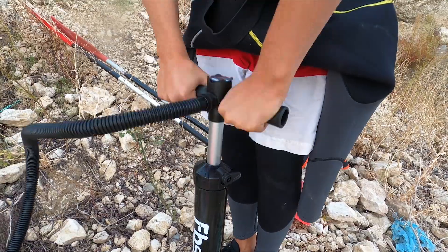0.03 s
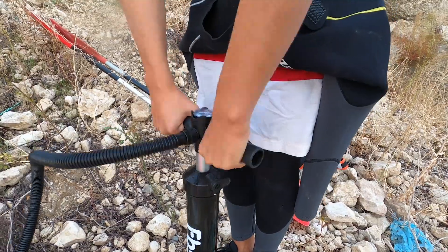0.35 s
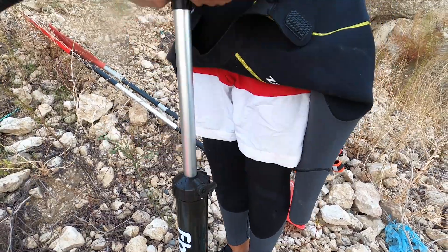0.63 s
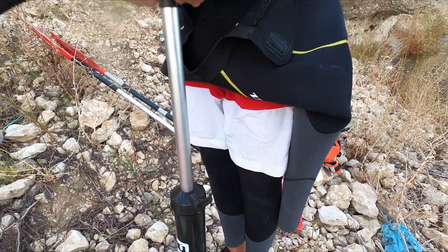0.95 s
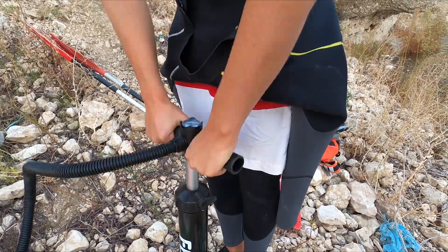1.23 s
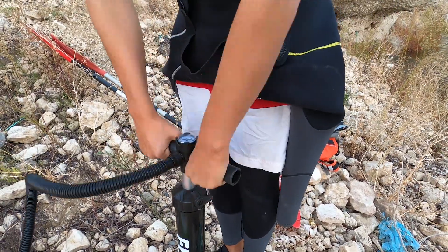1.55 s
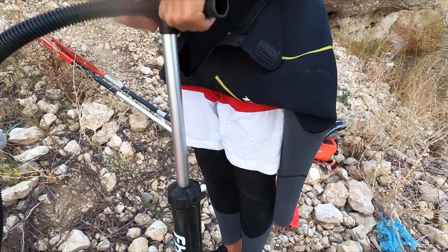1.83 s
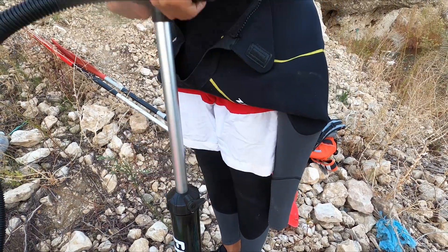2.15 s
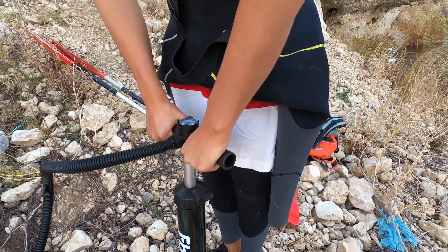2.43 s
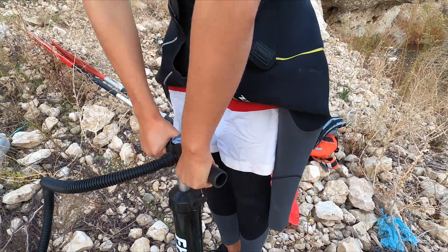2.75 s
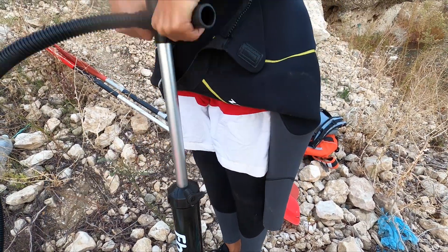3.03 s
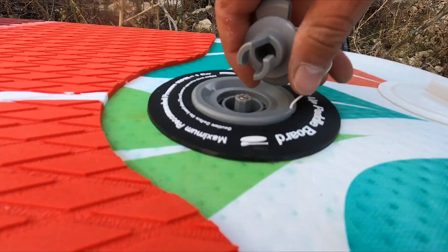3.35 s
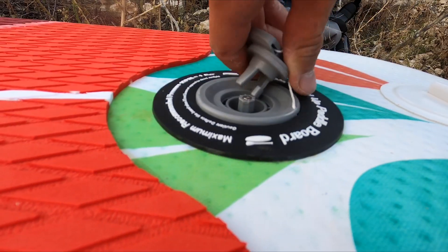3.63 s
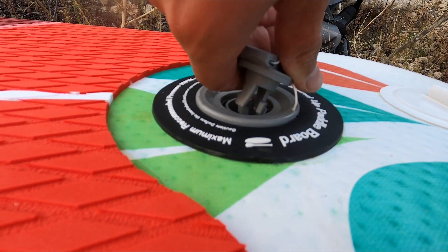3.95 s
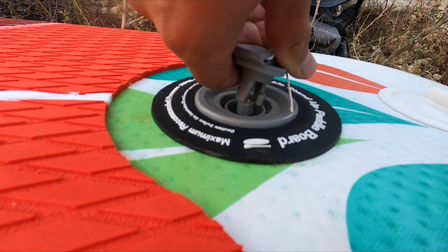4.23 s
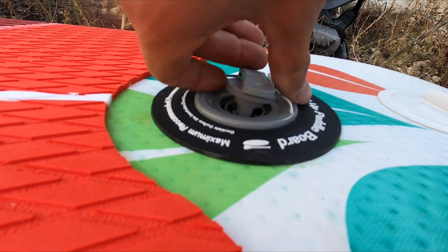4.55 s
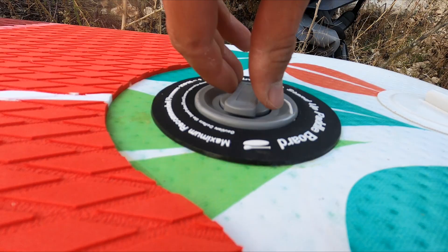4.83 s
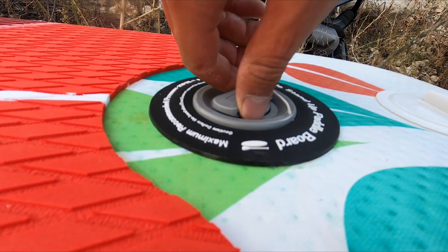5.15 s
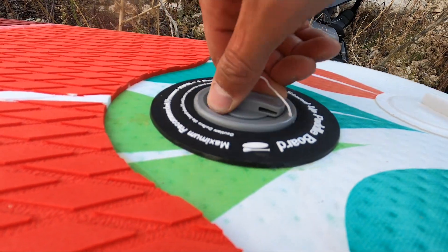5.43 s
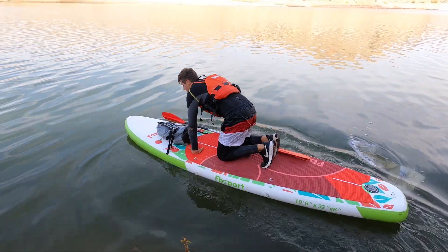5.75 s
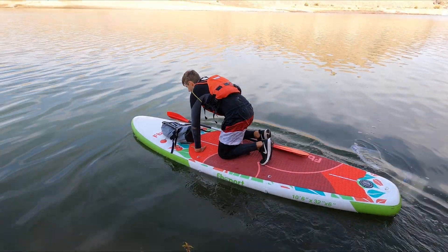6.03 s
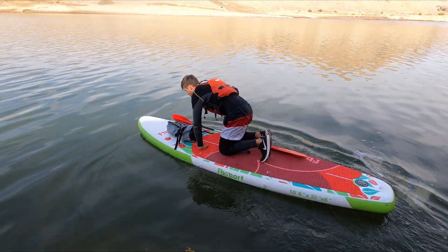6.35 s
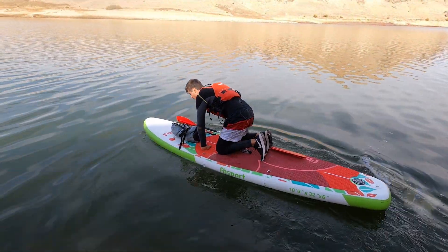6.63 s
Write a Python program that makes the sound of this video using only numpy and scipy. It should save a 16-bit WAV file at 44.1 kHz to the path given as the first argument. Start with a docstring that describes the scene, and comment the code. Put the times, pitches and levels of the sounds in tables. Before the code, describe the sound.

Rhythmic whooshing strokes of a hand pump, then close clicks and hollow knocks of a valve cap being closed, and finally gentle water lapping.

```python
"""First a double-action hand pump fills a paddle board on a stony shore: turbulent air hisses on every
stroke, the piston thuds and the loose handle clacks. Then, close by, fingers rub the board while a
plastic cap is fumbled into the valve; its impacts ring the seat, the spring and the taut board.
The cap is pressed home and twisted shut, rasping by stick-slip friction. Last, the board glides off
over a calm lake, where ringing bubbles trickle and one small wave laps along the hull."""
import sys
import numpy as np
from scipy import signal
from scipy.fft import rfft, irfft, next_fast_len
from scipy.io import wavfile
from scipy.ndimage import uniform_filter1d

SR = 44100
rng = np.random.default_rng(int(sys.argv[2]) if len(sys.argv) > 2 else 0)


def store_pcm(level_fs):
    """Save levels as 16-bit WAV."""
    pcm = np.round(np.clip(level_fs, -1, 1) * 32767).astype(np.int16)
    wavfile.write(sys.argv[1], SR, np.atleast_2d(pcm).T)


N = 303804
TIME = np.arange(N) / SR
BLOW = np.arange(SR // 8) / SR   # time within one short blow
PUMP_END_S, VALVE_END_S, LAKE_START_S = 3.42, 5.745, 5.96
HOSE_EXPONENT = .44   # hose amplitude grows as this power of the flow

# Levels in the tables are relative.
# downstrokes: start/s, end/s, rush level/dB, jet level/dB, lead of the bump at the top/s
PUSH_STROKES = [(-.12, 0.407, -33, -48, .05), (1.119, 1.597, -34.5, -51.5, .059),
                (2.312, 2.794, -34, -55, .041)]
# upstrokes: start/s, end/s, rush level/dB, jet level/dB, top speed t/s, seal thud t/s
PULL_STROKES = [(0.438, 1.008, -28.5, -48.5, .80, 0.56), (1.634, 2.186, -29.5, -50, 2.0, 1.7),
                (2.844, 3.408, -29.5, -49.5, 3.19, 2.959)]
# turbulence spectra of downstroke, upstroke, thin jet and hose: f/Hz, level/dB
PUSH_SPECTRUM = [(500, -29), (850, -31), (1050, -8), (1900, -6.5), (2450, -0.5), (2900, -4), (3500, -6),
                 (4400, -16.5), (6000, -42), (9000, -30)]
PULL_SPECTRUM = [(500, -29), (850, -26), (1050, -9.5), (1900, -9.5), (2400, -3), (2800, -4.5), (3500, -7.5),
                 (4400, -16), (6000, -31), (9000, -35.5)]
JET_SPECTRUM = [(2800, -13), (4000, 18), (5500, 11.5), (7000, 7), (8600, 4.5), (10000, -2.5), (11200, -5.5),
                (12400, 4.5), (13500, -3), (15700, -23.5)]
HOSE_SPECTRUM = [(25, 2), (70, -2), (150, -5), (280, -1), (450, -7.5), (700, -6), (1100, -6), (2000, -19)]
# impacts of the loose handle: t/s, clack level/dB, thud level/dB, thud f/Hz
HANDLE_CLACKS = [(.023, -42.5, -35.5, 205), (.105, -27, -38.5, 233), (0.485, -43.5, -36, 111),
                 (1.681, -39, -44.5, 200), (2.216, -49, -52, 290), (2.41, -33.5, -38, 240)]
# harder tugs on the handle: t/s, width/s, level/dB, f/Hz
HANDLE_TUGS = [(0.575, 0.036, -32.5, 2820), (.72, .04, -34, 2500), (0.875, 0.022, -34, 2680),
               (0.949, 0.028, -37, 3720), (1.865, 0.042, -27, 2680), (2.015, 0.038, -25, 2590),
               (2.106, 0.037, -34, 3640), (2.923, 0.032, -41.5, 2900), (3.076, 0.062, -28.5, 2730),
               (3.3, 0.061, -39, 1360)]
# fingers bearing on the board: start/s, end/s, level/dB
FINGER_GRIPS = [(3.38, 3.455, -35.5), (3.72, 4.06, -38.5), (4.37, 5.133, -38.5), (5.387, 5.451, -25),
                (5.577, 5.648, -36.5)]
# friction spectra of board and skin: f/Hz, level/dB
RUMBLE_SPECTRUM = [(25, -13), (58, -9), (76, 6), (125, -6), (175, -5.5), (270, -11.5), (400, -21.5),
                   (600, -29.5), (1200, -54)]
SKIN_SPECTRUM = [(400, 1), (1000, 5.5), (2000, 1), (3500, -3), (4600, -12.5), (6500, -13), (8300, -13),
                 (10000, -22.5), (15000, -34.5)]
# cap against valve: t/s, weight on the board/dB, click level/dB, click f/Hz, tick level/dB
CAP_TAPS = [(3.694, -28, -42, 880, -49), (3.731, -25, -39, 1430, -57), (3.768, -33.5, -28.5, 1800, -54),
            (3.848, -37.5, -46.5, 2150, -77), (3.897, -33.5, -37, 1890, -60.5),
            (3.982, -31, -30.5, 3250, -59.5), (4.015, -26.5, -34.5, 3300, -55.5),
            (4.132, -42, -58.5, 2310, -75), (4.365, -31, -40.5, 1976, -61.5),
            (4.401, -20.5, -25, 1645, -58), (4.453, -19.5, -23, 1630, -46), (4.502, -28.5, -34, 1730, -58),
            (4.655, -26, -34, 1745, -72), (4.675, -21, -25.5, 1653, -61.5),
            (4.749, -22.5, -32, 1000, -63.5), (4.774, -21, -27.5, 1680, -56),
            (4.823, -36, -27, 1590, -49.5), (4.835, -18, -29.5, 2180, -65.5),
            (4.973, -36.5, -45, 1240, -62.5), (5.019, -22, -58.5, 2100, -67.5),
            (5.083, -16.5, -31, 990, -52), (5.224, -32, -72, 1240, -78), (5.427, -22.5, -43, 1050, -56),
            (5.433, -22, -35, 2600, -56)]
# resonances of the cap: f/Hz, bandwidth/Hz, level/dB
CAP_MODES = [(467, 90, 16.5), (889, 510, 16), (1350, 250, -12.5), (1700, 1200, -15), (2496, 600, -1.5),
             (3680, 210, 6)]
# modes of the inflated board and the valve seat: f/Hz, level/dB, T60/s
BOARD_MODES = [(77.1, 0.5, 0.42), (91.7, -0.5, 0.38), (108, -2, 0.2), (148.6, -5, 0.27), (174.5, 2.5, 0.18),
               (198.1, -0.5, 0.21), (231.5, -4, 0.35), (264, -10, 0.56), (316, -33, 0.59),
               (346.6, -12, 0.16)]
SEAT_MODES = [(240, -8, 0.053), (362, -22.5, 0.019), (420, -0.5, 0.073), (463, -6.5, 0.088),
              (594, -11, 0.03), (696, -13.5, 0.062)]
# modes rung by twangs of the valve spring: t/s, f/Hz, level/dB, T60/s
SPRING_TWANGS = [(3.77, 1460, -58, 0.45), (4.016, 3175, -52, 0.28), (4.454, 1970, -37.5, 0.74),
                 (4.455, 2300, -45, 0.44), (4.677, 2290, -50, 0.61), (4.83, 1986, -38.5, 0.31)]
# cap rubbing in its seat: t/s, length/s, level/dB, slip rate/Hz, f/Hz, bandwidth/Hz, seat level/dB
CAP_RUBS = [(4.372, 0.029, -39, 320, 1960, 620, -40), (4.448, 0.019, -32.5, 350, 1870, 530, -37.5),
            (4.801, 0.037, -29, 320, 1640, 307, -28), (4.995, 0.012, -43, 230, 3030, 900, -44),
            (5.066, 0.0081, -43.5, 300, 3020, 890, -39), (5.382, 0.071, -29.5, 240, 936, 280, -27.5)]
# spectra of water, spray and breeze: f/Hz, level/dB
WATER_SPECTRUM = [(300, 8), (600, 1), (1400, 3), (2200, 0), (3500, -7.5), (5000, -11.5), (8000, -37),
                  (12000, -37)]
SPRAY_SPECTRUM = [(3000, 4), (5500, -4), (8000, -4.5), (11000, -13), (15000, -29)]
BREEZE_SPECTRUM = [(25, -7), (45, 0), (80, -1.5), (140, 0), (200, -9), (400, -23), (900, -47)]
# bubbles from drips and from plops under the hull: t/s, level/dB, f/Hz
NEAR_DRIPS = [(6.077, -36, 2160), (6.11, -38.5, 1100), (6.26, -41.5, 3200), (6.338, -43, 1080),
              (6.673, -34, 2070), (6.825, -34, 1420)]
HULL_PLOPS = [(6.228, -36, 306), (6.531, -27.5, 258), (6.55, -29.5, 246), (6.765, -28, 290)]
# left-right coherence of the noises: f/Hz, coherence (0-1)
COHERENCE = [(60, 1), (200, 1), (1400, 1), (3100, 1), (4500, 1), (7000, 1), (13000, 0.3)]
# left channel over right: f/Hz, level/dB
PUMP_BALANCE = [(100, -1.5), (5000, 0.4), (8500, 0), (12500, -11.5), (15000, -16)]
VALVE_BALANCE = [(60, -2), (200, -3), (1200, -3), (2400, 1.5), (4400, 1), (8000, -8), (15000, -1)]
# scattering by nearby surfaces against the direct sound: f/Hz, level/dB
PUMP_ECHOES = [(100, -41), (1300, -41), (3000, -20), (6000, -16.5)]
VALVE_ECHOES = [(80, -31), (200, -15.5), (450, -5), (1000, -10.5), (2500, -25), (5000, -17)]


def from_db(db):
    """Amplitude ratio of a level."""
    return 10 ** (np.asarray(db) / 20)


def unit_rms(x):
    """Normalisation to unit power."""
    return x / np.sqrt(np.mean(x ** 2) + 1e-20)


def unit_blow(x):
    """Normalisation to the energy of 20 ms at unit power."""
    return x / np.sqrt(np.sum(x ** 2) / (SR / 50) + 1e-20)


def between(start, end):
    """Gate with 4 ms ramps."""
    return uniform_filter1d(1. * ((TIME >= start) & (TIME < end)), size=176)


def onset(start, attack_s):
    """Exponential approach from 0 to 1."""
    return 1 - np.exp(-np.maximum(TIME - start, 0) / attack_s)


def held(start, end, attack_s, release_db_per_s):
    """Attack, hold and exponential decay."""
    fall_db = np.minimum(release_db_per_s * np.maximum(TIME - end, 0), 200)
    return onset(start, attack_s) * from_db(-fall_db)


def hump(s, width_s):
    """Bell-shaped envelope of height 1."""
    return 1 / (1 + ((TIME - s) / width_s) ** 2 / 2) ** 2


def crest(s, rise_s, fall_s):
    """Exponential growth to 1 at time s, then decay."""
    return np.exp(-np.maximum((s - TIME) / rise_s, (TIME - s) / fall_s))


def drift(per_s):
    """Slow random modulation of unit variance."""
    knots = rng.standard_normal(N // 20)
    return np.interp(TIME * per_s, np.arange(len(knots)), knots) * np.sqrt(3 / 2)


def at_hz(points, hz):
    """Interpolation on a log-frequency axis."""
    f, value = np.transpose(points)
    return np.interp(np.log(hz + 1e-3), np.log(f), value)


def cut(x, hz, kind, order=2):
    """Butterworth filter."""
    sections = signal.butter(order, np.clip(hz, 10, .45 * SR), kind, fs=SR, output="sos")
    return signal.sosfilt(sections, x + 1e-18)


def ring(impulses, hz, t60):
    """Damped oscillator: each impulse starts a decaying sine."""
    r, w = from_db(-60 / (t60 * SR)), 2 * np.pi * hz / SR
    return signal.lfilter([0, np.sin(w)], [1, -2 * r * np.cos(w), r * r], impulses + 1e-18)


def resonate(x, hz, width_hz):
    """Driven resonator with unit peak gain."""
    r = np.exp(-np.pi * width_hz / SR)
    feedback = [1, -2 * r * np.cos(2 * np.pi * hz / SR), r * r]
    return signal.lfilter(np.array([1, 0, -1]) * (1 - r * r) / 2, feedback, x + 1e-18)


def add(track, s, sound):
    """Superposition of a sound at time s."""
    i = max(round(s * SR), 0)
    track[i:i + len(sound)] += sound[:N - i]


def burst(decay_s, tail_db=-28, tail_s=.045):
    """Broadband excitation by a brief contact, with a faint tail."""
    envelope = np.exp(-BLOW / decay_s) + from_db(tail_db) * np.exp(-BLOW / tail_s)
    return rng.standard_normal(len(BLOW)) * envelope * (1 - BLOW / BLOW[-1])


def noise(spectrum):
    """Partly coherent stereo noise of a given spectrum, at unit power."""
    size = next_fast_len(N)
    hz = np.fft.rfftfreq(size, 1 / SR)
    mid, side = rfft(rng.standard_normal((2, size)))
    alike = np.clip(at_hz(COHERENCE, hz), 0, 1)
    stereo = np.sqrt(1 + alike) * mid + np.sqrt(1 - alike) * side * [[1], [-1]]
    gain = from_db(at_hz(spectrum, hz)) / (1 + (hz / spectrum[-1][0] / 2) ** 4)
    return unit_rms(irfft(gain * stereo, size)[:, :N])


def flow(start, end, attack_s, fade_db, power):
    """Piston-driven flow builds up, then fades toward the end of travel."""
    travel = np.clip((TIME - start) / (end - start), 0, 1.5)
    return onset(start, attack_s) * from_db(np.maximum(fade_db * travel ** power, -120))


def barrel(air, start, end, speed, pitch, first_trip_s, last_trip_s, echo):
    """Comb filtering: inlet noise interferes with an echo whose delay follows the piston."""
    on, out = speed > .001, np.zeros((2, N))
    travel = (TIME[on] - start) / (end - start) + .098 * drift(13)[on]   # the arms push unevenly
    trip_s = first_trip_s + (last_trip_s - first_trip_s) * travel
    warped_time = TIME[on][0] + np.cumsum(pitch[on]) / SR
    rush = np.array([np.interp(warped_time, TIME, side) for side in air])
    reflected = np.array([np.interp(TIME[on] - trip_s, TIME[on], side) for side in rush])
    out[:, on] = unit_rms(rush + echo * reflected)
    return out * speed


def pushes(jet, hose):
    """Downstroke turbulence starts abruptly and dies under back pressure; the outlet half whistles."""
    air, out = noise(PUSH_SPECTRUM), 0
    outlet = unit_rms(resonate(air, hz=2870, width_hz=420))
    for start, end, air_db, jet_db, _ in PUSH_STROKES:
        speed = flow(start, end, attack_s=.0074, fade_db=-30, power=2.7)
        whistle = from_db(-2) * onset(start, attack_s=.083) ** 2 * outlet
        rush = barrel(air + whistle, start, end, speed, pitch=np.full(N, 1.01),
                      first_trip_s=.0017, last_trip_s=.00207, echo=.17)
        out += from_db(air_db) * rush + from_db(jet_db + 5) * speed ** .98 * jet
        out += speed ** HOSE_EXPONENT * hose
    return out


def thud(db, hz, cycles=.66):
    """Heavily damped vibration of the struck barrel, with a short rumble."""
    blow = np.sin(2 * np.pi * hz * BLOW) * BLOW * np.exp(-2 * BLOW * hz / cycles)
    rumble = cut(burst(.038), 294, "low")
    return from_db(db) * (unit_blow(blow) + from_db(-9) * unit_blow(rumble))


def snap(db):
    """A short impact excites a broad, bright resonance of plastic."""
    contact = (1 - np.exp(-BLOW / .002)) * burst(.003, tail_db=-30, tail_s=.012)
    return from_db(db) * unit_blow(cut(resonate(contact, hz=2400, width_hz=2200), 4500, "low"))


def pump_knocks():
    """Impact sound of the piston, seal, flap valve and loose handle."""
    out = np.zeros(N)
    for start, *_, seal_s in PULL_STROKES:
        add(out, start + .014, thud(db=-41.5, hz=220))   # slack is taken up
        add(out, seal_s, thud(db=-30, hz=153))   # the seal seats
        add(out, seal_s + .019, thud(db=-39.5, hz=153))   # and rebounds
    for start, *_, lead_s in PUSH_STROKES:
        if start > 0:
            add(out, start - lead_s, thud(db=-38, hz=248))   # bump at the top
            add(out, start, snap(db=-36.5))   # the flap snaps over
            add(out, start + .026, thud(db=-42, hz=142))   # the piston takes the load
    for s, clack_db, thud_db, thud_hz in HANDLE_CLACKS:
        contact = burst(.0028, tail_db=-52, tail_s=.0085)
        clack = cut(resonate(contact, hz=540, width_hz=400), 2300, "low")
        add(out, s, thud(thud_db, thud_hz) + from_db(clack_db) * unit_blow(clack))
        add(out, s - .0015, snap(clack_db - 7))
    return out


def pulls(jet, hose, thinning=.91, dulling=.29, edge_hz=1520):
    """Upstroke turbulence swells, rises and thins at top speed; a gust then passes jet and hose."""
    air, out = noise(PULL_SPECTRUM), 0
    for start, end, air_db, jet_db, surge_s, _ in PULL_STROKES:
        speed = flow(start, end, attack_s=.11, fade_db=-27, power=12)
        jet_flow = onset(start, .063) * flow(start, end, attack_s=.063, fade_db=-31.5, power=17)
        surge, gust = hump(surge_s, width_s=.075), hump(surge_s + .092, width_s=.1)
        pitch = .97 + .09 * surge + .07 * (1 - speed)
        rush = barrel(air, start, end, speed, pitch, first_trip_s=.002283, last_trip_s=.00117, echo=.41)
        low = cut(rush, edge_hz, "low", order=4)
        low = cut(low[:, ::-1], edge_hz, "low", order=4)[:, ::-1]   # backward pass: zero phase
        out += from_db(air_db) * (rush - thinning * surge * low - dulling * gust * (rush - low))
        out += from_db(jet_db + 3.5 * gust) * jet_flow * jet
        out += from_db(5.5 * gust) * speed ** HOSE_EXPONENT * hose
    return out


def tugs():
    """Narrow-band flow noise swells with each harder tug."""
    air = noise(PULL_SPECTRUM)
    return sum(from_db(db) * hump(s, width_s) * unit_rms(resonate(air, hz, width_hz=430))
               for s, width_s, db, hz in HANDLE_TUGS)


def pump_air(flutter_db=.85):
    """Turbulent noise of all strokes over a faint steady hiss; a thin leak precedes each push."""
    jet = noise(JET_SPECTRUM)
    hose = noise(HOSE_SPECTRUM) * from_db(-50 + 1.9 * drift(24.92))
    hiss = noise(PUSH_SPECTRUM)
    rush = pulls(jet, hose) + tugs() + pushes(jet, hose)
    rush *= from_db(flutter_db * (drift(45) + drift(250)))
    turning = sum(between(start - .07, start) for start, *_ in PUSH_STROKES)
    thin = unit_rms(resonate(noise(JET_SPECTRUM), hz=6500, width_hz=900))
    leak = turning * (from_db(-61) * thin + from_db(-55) * hiss)
    return (rush + leak + from_db(-66) * hiss + from_db(-74) * jet) * between(0, PUMP_END_S)


def fingers(skin_db=-26.5, shore_db=-66):
    """Sliding friction on the taut board: rumble and hiss follow the grip, over the shore's hiss."""
    grip = sum(from_db(db) * held(start, end, attack_s=.0091, release_db_per_s=143)
               for start, end, db in FINGER_GRIPS)
    hiss = np.hypot(grip * from_db(skin_db + 2.6 * drift(89)), from_db(shore_db))
    return grip * noise(RUMBLE_SPECTRUM) + hiss * noise(SKIN_SPECTRUM)


def strike(modes, times, levels_db, spread_db):
    """Modal superposition: every blow excites each mode with a random strength."""
    at, out = (np.asarray(times) * SR).astype(int), np.zeros(N)
    for k, (hz, db, t60) in enumerate(modes):
        impulses = np.zeros(N)
        impulses[at] = from_db(levels_db + db + spread_db * rng.standard_normal(len(at)))
        out += ring(impulses, hz, t60) * (-1) ** (k // 2)
    return out


def cap_body(force):
    """Forced response of the hollow cap."""
    return sum((-1) ** k * from_db(db) * resonate(force, hz, width)
               for k, (hz, width, db) in enumerate(CAP_MODES))


def cap_taps(touches):
    """Impacts click at a pitch set by the point of contact and excite the modes of seat and board."""
    out = np.zeros(N)
    bite = 1 - np.exp(-(BLOW / .00091) ** 2)   # soft plastic takes a moment to bite
    for s, weight_db, click_db, click_hz, tick_db in touches:
        contact = bite * burst(.0016, tail_db=-27, tail_s=.017)
        click = unit_blow(resonate(contact, click_hz, width_hz=360))
        click += from_db(-9) * unit_blow(cap_body(contact))
        click = cut(click, max(3750, 1.29 * click_hz), "low", order=8)
        tick = bite * burst(.0026, tail_db=-24, tail_s=.03)
        tick = cut(cut(tick, 7600, "high", order=4), 6000, "low", order=4)
        add(out, s - .0005, from_db(click_db) * unit_blow(click) + from_db(tick_db) * unit_blow(tick))
        thump = cut(resonate(burst(.014), hz=240, width_hz=110), 450, "low", order=3)   # board's skin
        add(out, s, from_db(weight_db - 2) * unit_blow(thump))
    times, weights_db = np.transpose(touches)[:2]
    boom = strike(BOARD_MODES, times + .002, weights_db - 4.5, spread_db=1.5)
    clunk = strike(SEAT_MODES, times + .001, weights_db - .5, spread_db=2.5)
    return out + cut(boom + clunk, 900, "low", order=3)


def spring():
    """Free vibration of the valve spring, one mode to a row; a twang may ring several."""
    return sum(strike([(hz, db, t60)], [s], 0, spread_db=2) for s, hz, db, t60 in SPRING_TWANGS)


def cap_rubs(jitter=.13, uneven_db=5, grit=.1, rim_hz=3050, rim_width_hz=1300):
    """Stick-slip friction: uneven pulses ring the cap, its rim and the seat, under a dry scratch."""
    out = np.zeros(N)
    for start, length_s, db, slip_hz, hz, width, seat_db in CAP_RUBS:
        pressure = held(start, start + length_s, attack_s=.0035, release_db_per_s=606)
        on = pressure > .01
        cycles = np.cumsum((slip_hz * np.exp(jitter * drift(200)))[on]) / SR
        slips = np.diff(np.floor(cycles), prepend=-1) * from_db(uneven_db * drift(400)[on])
        grains = rng.standard_normal(N)[on] * from_db(.9 * drift(220)[on])
        force = slips + grit * grains
        rasp = unit_rms(resonate(force, hz, width)) + from_db(-7) * unit_rms(cap_body(force))
        rasp = unit_rms(cut(rasp, 3650, "low", order=8))
        scratch = from_db(-29) * unit_rms(cut(grains, [4200, 8000], "band"))
        rim = resonate(resonate(force, rim_hz, rim_width_hz), rim_hz, rim_width_hz)
        cap = rasp + scratch + from_db(-19) * unit_rms(rim)
        seat = unit_rms(sum(ring(slips, f, t60) * from_db(level) for f, level, t60 in SEAT_MODES))
        out[on] += pressure[on] * (from_db(db) * cap + from_db(seat_db) * seat)
    return out


def twist_jerks(start_s=5.324, weight_db=-31.5, click_db=-37, click_hz=967, tick_db=-69):
    """Stick-slip starts the twist: five ever faster jerks, as rows like those of CAP_TAPS."""
    gaps_s = .0195 * .85 ** np.arange(5)
    return [(s, weight_db, click_db, click_hz, tick_db) for s in start_s + np.cumsum(gaps_s) - gaps_s]


def bubble(hz, cycles, rise):
    """Damped pulsation of a bubble, rising in pitch as it nears the surface."""
    age = BLOW * hz / cycles
    phase = 2 * np.pi * hz * BLOW * (1 + rise * np.minimum(age, 1))
    return np.sin(phase) * from_db(-60 * age) * (1 - np.exp(-BLOW * hz * 2))


def trickle(per_s=320):
    """Resonances of many small bubbles, random in time, pitch and strength."""
    out, span_s = np.zeros(N), TIME[-1] - LAKE_START_S
    for when, pitch, rank in rng.random((int(per_s * span_s), 3)):
        hz = 650 * 9 ** pitch
        gain = from_db(at_hz(WATER_SPECTRUM, hz) - 4 * np.log(rank + .033)) * hz   # few are loud
        add(out, LAKE_START_S + when * span_s, gain * bubble(hz, cycles=32, rise=.057))
    return out / np.std(out[TIME > LAKE_START_S])


def drips_and_plops():
    """Bubble resonance nearby: drips ring high with a faint splash, plops under the hull ring low."""
    out = np.zeros(N)
    for s, db, hz in NEAR_DRIPS:
        splash = unit_blow(cut(burst(.0034), [900, 5000], "band"))
        add(out, s, from_db(db) * bubble(hz, cycles=36, rise=.052) + from_db(db - 29) * splash)
    for s, db, hz in HULL_PLOPS:
        add(out, s, from_db(db) * bubble(hz, cycles=14, rise=.13))
    return out


def lake(wave_s=6.73, rise_s=.24):
    """Bubble and flow noise swell as one small wave runs along the hull, over a low breeze."""
    water = from_db(-5.5) * trickle() + from_db(-2.5) * noise(WATER_SPECTRUM)
    water *= from_db(-60 + 16 * crest(wave_s, rise_s, fall_s=.68))
    spray_db = -79 + 28 * crest(wave_s, rise_s, fall_s=.14) + 1.4 * drift(200)
    spray = from_db(spray_db) * noise(SPRAY_SPECTRUM)
    near = drips_and_plops()
    breeze = from_db(-49) * noise(BREEZE_SPECTRUM)
    return (water + spray + near + breeze) * onset(LAKE_START_S, attack_s=.1)


def place(x, balance, scattered, left_lead_s, scatter_s):
    """Localisation by level and time differences, with scattered sound in antiphase between sides."""
    size = next_fast_len(N + len(BLOW))
    hz = np.fft.rfftfreq(size, 1 / SR)
    half = np.array([[.5], [-.5]])
    direct = from_db(half * at_hz(balance, hz)) * np.exp(2j * np.pi * hz * left_lead_s * half)
    echoes = rng.standard_normal(len(BLOW)) * np.exp(-BLOW / scatter_s)
    scatter = from_db(at_hz(scattered, hz)) * rfft(echoes / np.linalg.norm(echoes), size)
    response = direct + scatter * np.sign(half) * np.abs(direct).min(axis=0)
    return irfft(rfft(x, size) * response, size)[:, :N]


def scene():
    """Superposition of pump, valve and lake, one after another."""
    pump = pump_air() + pump_knocks()
    pump = place(pump, PUMP_BALANCE, PUMP_ECHOES, left_lead_s=.00001, scatter_s=.00505)
    valve = cap_taps(CAP_TAPS + twist_jerks()) + spring() + cap_rubs() + fingers()
    valve = place(valve, VALVE_BALANCE, VALVE_ECHOES, left_lead_s=-.000057, scatter_s=.008)
    return pump + valve * between(PUMP_END_S, VALVE_END_S) + lake()


def record(dry, low_hz=22, high_hz=15750):
    """Band limiting removes the deepest rumble and the highest treble."""
    low_pass = signal.ellip(10, .1, 80, high_hz, fs=SR, output="sos")
    return signal.sosfilt(low_pass, cut(dry, low_hz, "high"))


dry = scene()
out = record(dry)
store_pcm(out)
```